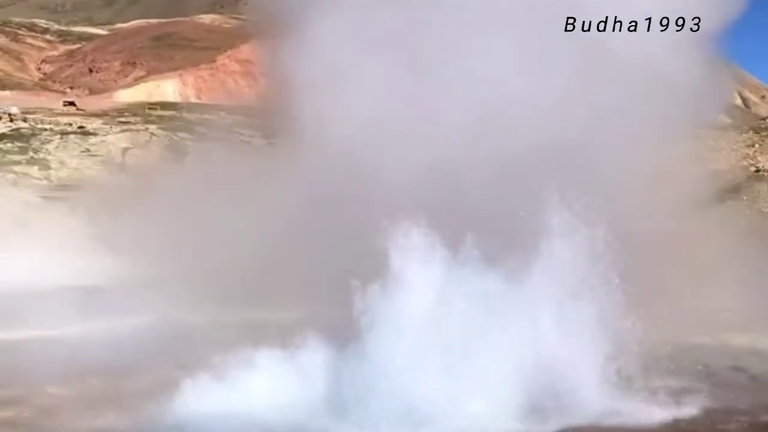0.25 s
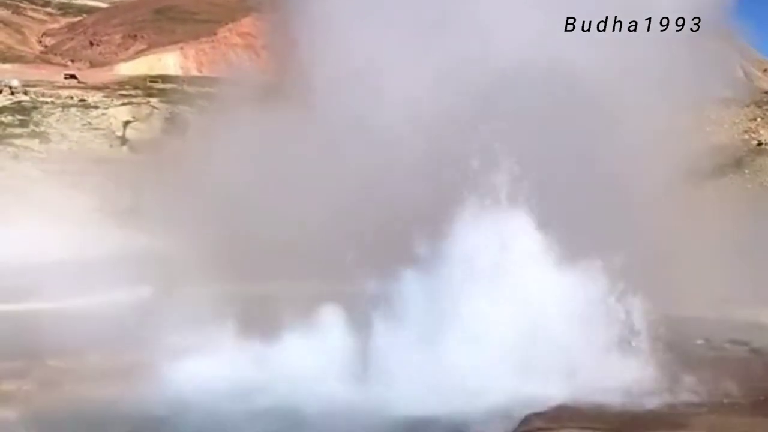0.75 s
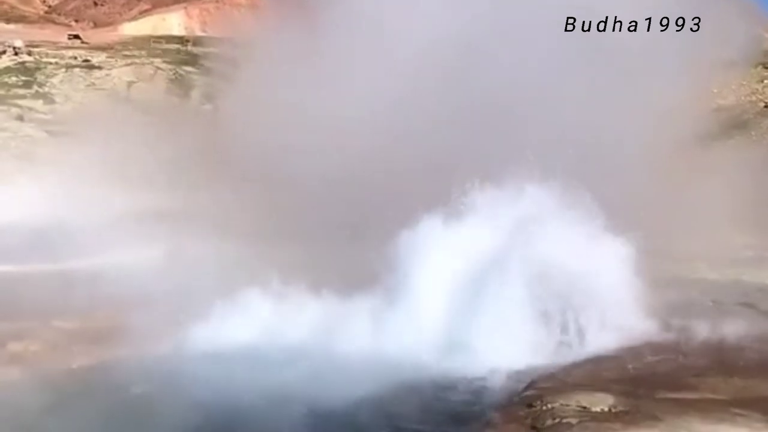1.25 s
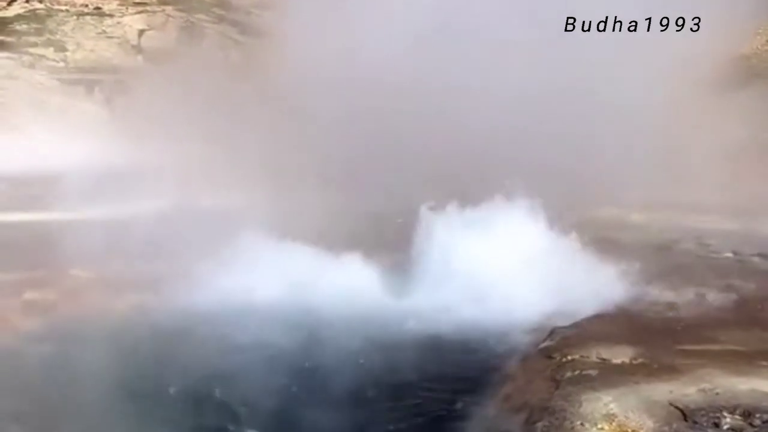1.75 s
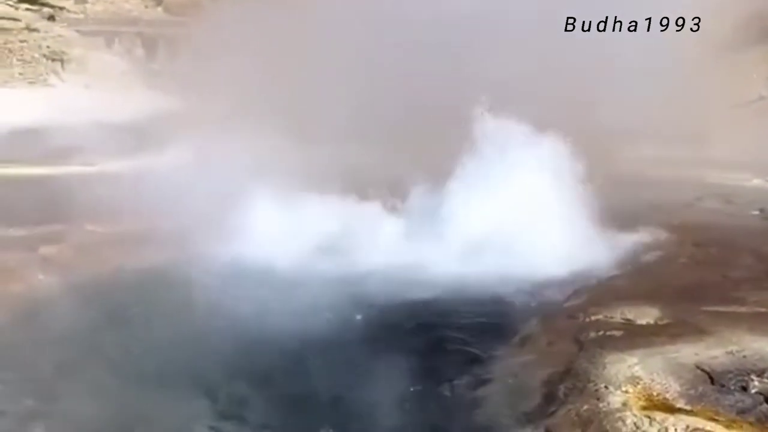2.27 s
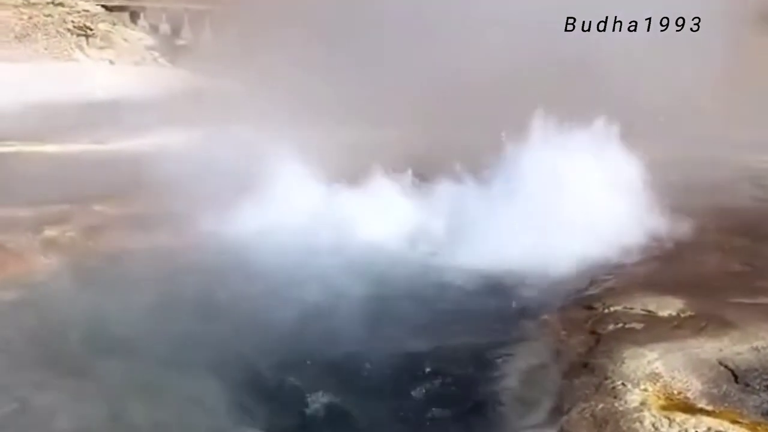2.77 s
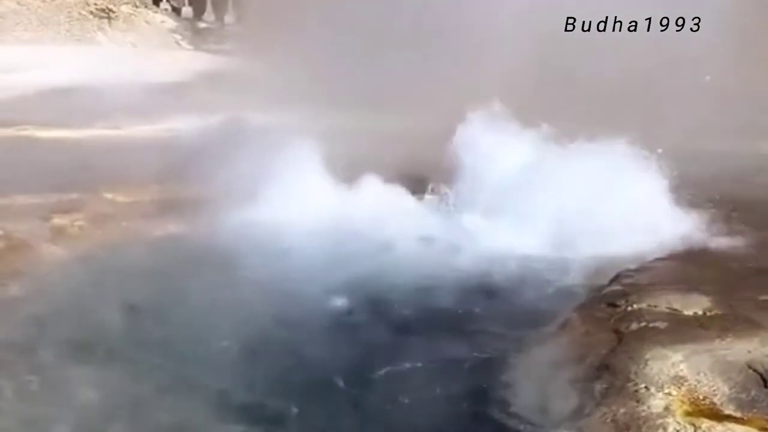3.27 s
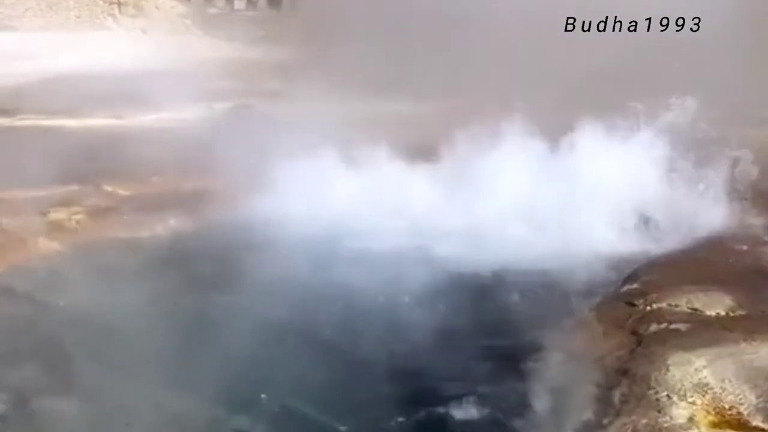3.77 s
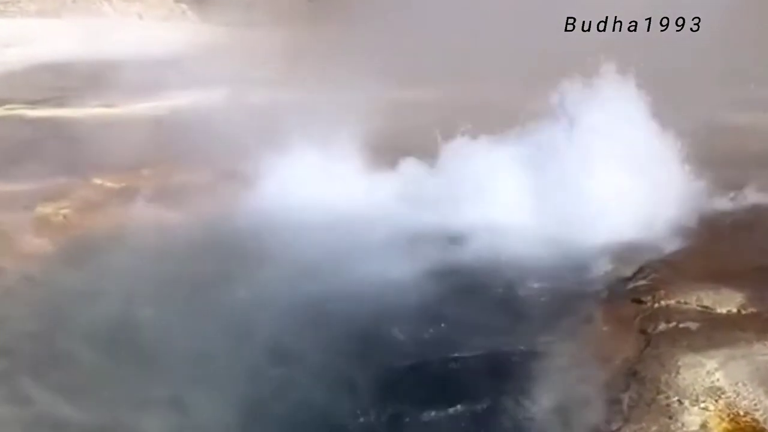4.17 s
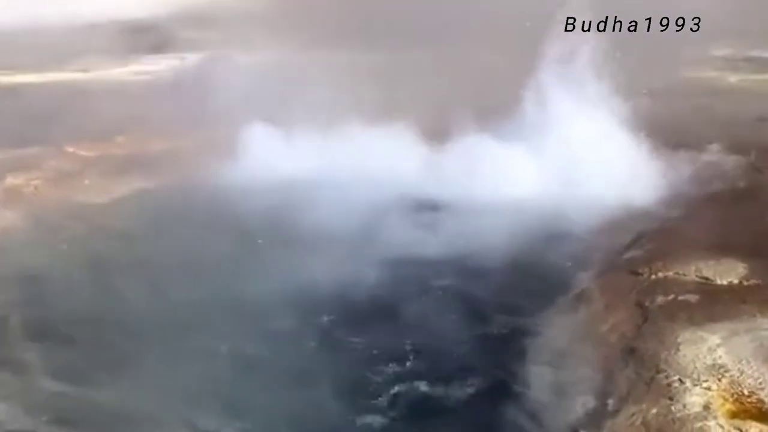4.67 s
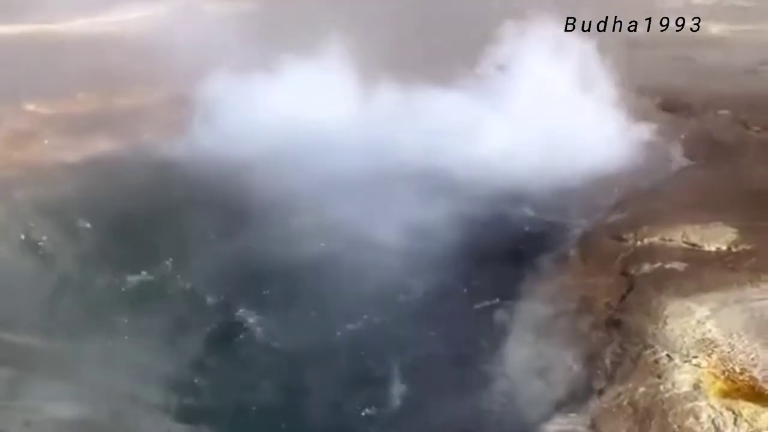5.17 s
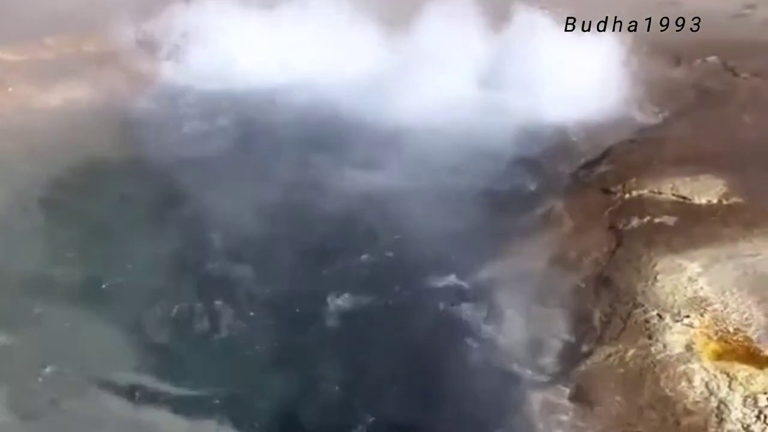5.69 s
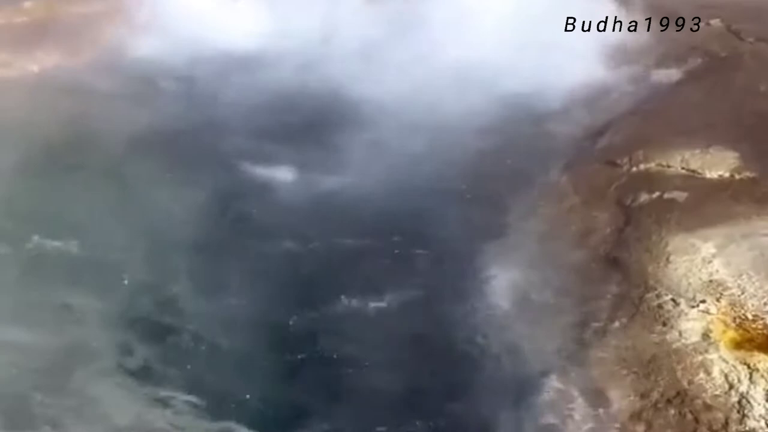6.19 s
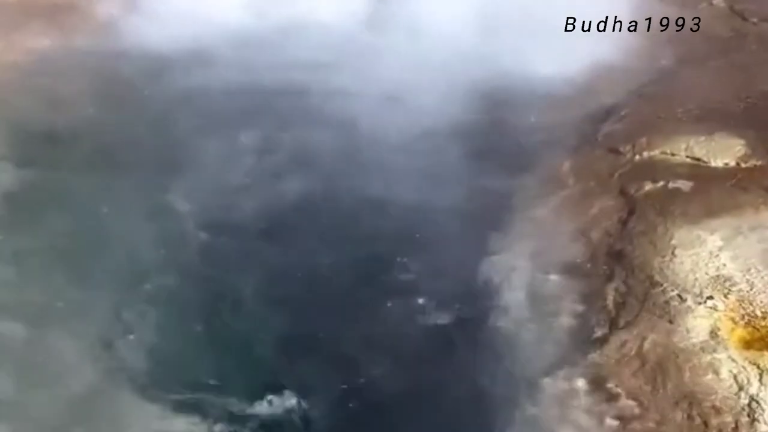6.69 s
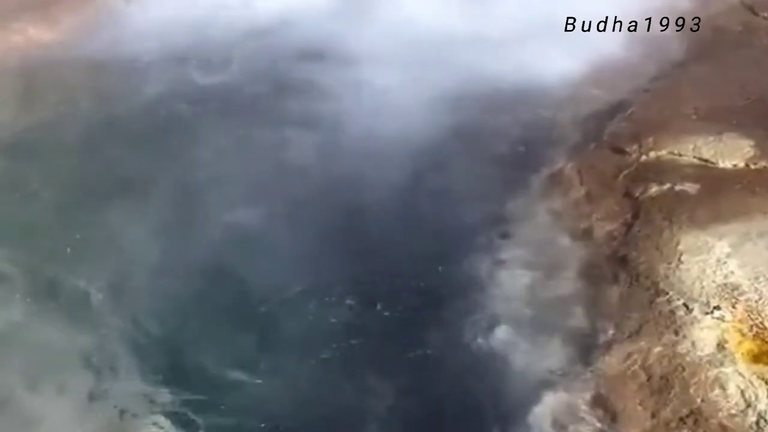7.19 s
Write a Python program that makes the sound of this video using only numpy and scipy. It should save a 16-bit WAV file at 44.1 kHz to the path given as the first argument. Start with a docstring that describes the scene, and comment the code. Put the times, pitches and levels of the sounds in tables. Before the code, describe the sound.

Wind batters a small stereo microphone beside a boiling geyser outdoors. From 0 to 1.3 seconds, low rumble and brief ragged flutters come and go, with a soft early thump and a slap near 0.8; a wide, thin hiss of spray sits behind, with tiny spits at the start and 0.5. The hiss swells a little around 1.4 as another slap lands, and scattered slaps follow to 2.2. A heavy round thump hits at 2.7, then a rapid run of dull slaps from 2.9 to 3.1. The wind flutters on, with a low thump at 3.8 and hard claps at 4.2 to 4.5. The spray is fainter now, with short spits at 5.0, 5.25 and 6.1. Sharper slaps cluster from 5.6 to 5.9. From 6.4 to the end near 7.4, gusts become harsh, tearing and crackling, with overloaded blows and deep closing thumps.

```python
"""Gusts of wind beside a geyser

Wind buffets a small pair of microphone ports while a geyser boils up and hisses across a pool.
Wind eddies are chopped, coloured noise: a lumpy rumble, a ragged flutter and a fine tearing.
Slaps are sharp fronts followed by short noise; thumps are a couple of low cycles under a swell.
The geyser is a smooth, wide, patchy hiss, with spits of water lifting it for a moment.
"""
import sys
import numpy as np
from scipy import signal
from scipy.fft import rfft, irfft, next_fast_len
from scipy.io import wavfile
from scipy.ndimage import uniform_filter1d

SR = 44100
rng = np.random.default_rng(int(sys.argv[2]) if len(sys.argv) > 2 else 0)


def generate_wav(signal):
    """Clip the signal to [-1, 1] and save it as 16-bit WAV at the path in sys.argv[1]."""
    frames = np.transpose(np.atleast_2d(signal))
    scaled = np.clip(frames, -1, 1) * 32767
    pcm = np.round(scaled).astype(np.int16)
    wavfile.write(sys.argv[1], SR, pcm)


N = 328104  # length [samples]

# Large eddies rolling over both ports, before buffets add to them:
# (time [s], rumble level [dB], gain of the deepest bass [dB])
GUSTS = [(0, -32.5, 5), (.15, -27, 9.5), (.3, -28.5, 0), (.6, -22, -5), (.9, -28, 0.5), (1.03, -32.5, -0.5),
         (1.45, -24, -5.5), (2.15, -28.5, 3.5), (2.25, -19.5, -2.5), (2.4, -25, -4), (2.55, -22, -4),
         (2.68, -9, -20), (2.83, -20, -4), (3.3, -25.5, 5.5), (4.15, -19.5, -6), (4.3, -17.5, 0),
         (4.7, -23, -2.5), (5.07, -27.5, -4), (5.55, -20.5, -3.5), (6.05, -36.5, 11), (6.6, -23, -1),
         (6.75, -22.5, 6.5), (7.2, -21, -2), (7.33, -16.5, 5), (7.44, -22.5, 9)]
# Buffets, each a short spell of small eddies:
# (start [s], length [s], flutter level [dB], tearing against flutter [dB],
#  one-port setting against flutter [dB]); the wind mix later lifts and colours the one-port setting
BUFFETS = [(0, 0.03, -21, -23, -7), (0.068, 0.038, -30.5, -0.5, 3.5), (0.157, 0.14, -26.5, -22.5, -2.5),
           (0.367, 0.14, -29.5, -20, -7.5), (0.544, 0.082, -22.5, -32, -8), (0.705, 0.12, -30.5, -9.5, 2),
           (0.875, 0.016, -24, -12, -12), (1.087, 0.068, -26.5, -33, -25), (1.355, 0.12, -27, -15, -6),
           (1.511, 0.035, -24.5, -11, 0.5), (1.549, 0.056, -20.5, -18.5, -6), (1.697, 0.053, -28, -37, 0),
           (1.795, 0.059, -34, -10, 6), (1.896, 0.055, -27.5, -13, -2), (1.969, 0.066, -24, -13, 0),
           (2.088, 0.021, -27.5, -10, 6.5), (2.199, 0.059, -23.5, -19.5, 0.5), (2.421, 0.14, -29.5, -23, 2),
           (2.57, 0.18, -26.5, -36, -4.5), (2.617, 0.068, -22.5, -17.5, -8), (2.753, 0.28, -25.5, -33, -13),
           (3.067, 0.1, -30.5, -24, -16), (3.331, 0.023, -33, -4, -9), (3.399, 0.054, -26.5, -13, -10),
           (3.462, 0.1, -32.5, -16, -5), (3.584, 0.079, -24.5, -36, -23), (3.731, 0.18, -22, -40, -9),
           (3.951, 0.24, -24.5, -23, -5.5), (4.226, 0.086, -22, -11, -5.5), (4.349, 0.081, -30, -5.5, -5),
           (4.493, 0.028, -33, -3.5, 8), (4.564, 0.11, -32, -18.5, 1.5), (4.705, 0.15, -28, -15, -15),
           (4.912, 0.082, -32, -13, -4), (5.109, 0.11, -23, -30, -4), (5.238, 0.053, -23, -34, -13.5),
           (5.333, 0.13, -26, -10.5, -2.5), (5.466, 0.087, -25.5, -5, -10), (5.552, 0.15, -29, -3.5, 0.5),
           (5.733, 0.11, -26, -7.5, -1), (5.828, 0.042, -26, 3.5, -8), (5.928, 0.065, -30.5, -3, -2),
           (6.038, 0.11, -36.5, 3.5, 3), (6.141, 0.22, -32, -14.5, -0.5), (6.381, 0.4, -25, -5, 1),
           (6.554, 0.12, -20, -1.5, -0.5), (6.739, 0.13, -27.5, 5, 2), (6.875, 0.14, -30.5, 3.5, 6),
           (7.156, 0.036, -26.5, -2.5, 7.5), (7.22, 0.032, -25, 6.5, -5), (7.322, 0.1, -27, -36, 6.5)]
# Levels between buffets: (flutter [dB], tearing [dB], one-port setting [dB])
CALM_LEVELS = (-43, -51, -38)
# Colours of the wind from large to tiny eddies; only the shape counts:
# (frequency [Hz], relative level per Hz [dB])
RUMBLE_COLOUR = [(20, -38), (40, -9.5), (60, 0), (130, -2), (220, -5), (330, -9), (600, -24.5),
                 (3000, -100)]
FLUTTER_COLOUR = [(60, -24.5), (200, 3.5), (350, 1), (600, 2), (900, -2), (1300, -10.5), (2000, -26.5),
                  (8000, -99)]
TEARING_COLOUR = [(400, -31), (1000, 3.5), (1500, 1.5), (2200, -6), (3200, -18), (4500, -30.5),
                  (7000, -44.5), (12000, -100)]
# Wind colour of the difference of the ports against their sum: (frequency [Hz], gain [dB])
WIND_DIFFERENCE = [(40, -33.5), (100, -13.5), (250, -12), (500, -8), (800, -7), (1200, -8.5), (1800, -14),
                   (4000, -3.5)]
# Single eddies bursting on the ports:
# (time [s], peak level [dB], centre frequency [Hz], dullness [power of the treble fall])
SLAPS = [(0.095, -17, 1210, 5.2), (0.83, -10.5, 965, 3.3), (1.416, -7.5, 650, 3.4), (1.719, -15, 554, 4.6),
         (1.985, -12.5, 795, 3.5), (2.169, -15, 910, 2.8), (2.182, -10, 1160, 4.8), (2.909, -7, 515, 3.5),
         (2.964, -9.5, 627, 5.6), (3.022, -6.5, 880, 4.3), (3.08, -7.5, 500, 4.1), (3.343, -14, 710, 3.4),
         (3.422, -6.5, 700, 4.2), (3.44, -23, 1080, 3.5), (4.246, -8, 800, 4.1), (4.254, -6, 900, 3.8),
         (4.317, -13, 1000, 4.2), (4.373, -4.5, 820, 3.5), (4.419, -11.5, 900, 3.7), (4.432, -13, 900, 4),
         (4.465, -17, 800, 3.2), (4.505, -13, 910, 3.6), (4.862, -9.5, 1060, 3.7), (5.367, -25, 834, 2.4),
         (5.496, -14, 830, 3.4), (5.634, -9.5, 1070, 3.1), (5.656, -5, 1110, 3.9),
         (5.732, -12.5, 1020, 3.3), (5.828, -10, 1320, 3.5), (5.848, -3, 1080, 3.3),
         (5.855, -12, 1400, 3.6), (5.871, -17, 1500, 4.2), (5.882, -15, 1300, 4.1), (5.906, -9, 1570, 4.6),
         (5.994, -13.5, 920, 3.8), (6.088, -15, 1120, 3.4), (6.123, -18, 1010, 4), (6.515, -3, 1300, 3),
         (6.68, -12, 1200, 3.1), (6.708, -3.5, 970, 2.7), (6.736, -15, 1200, 2.9), (6.761, -9.5, 888, 2.9),
         (6.795, -7.5, 1018, 2.6), (6.872, -10.5, 1210, 2.2), (6.927, -9, 1320, 3.5),
         (6.974, -7.5, 1630, 2.85), (7.008, -3, 2030, 3.3), (7.03, -20, 3020, 2.5),
         (7.118, -3.5, 1700, 2.8), (7.198, -6, 563, 2.64), (7.241, -5, 710, 3), (7.275, -3, 720, 2.3)]
# Large eddies landing as one round thump: (middle [s], peak of the swell [dB], pitch [Hz])
THUMPS = [(0.177, -12, 123), (2.234, -17, 110), (2.662, -5, 190), (2.69, -10, 171), (2.897, -13, 160),
          (3.838, -8.5, 181), (6.705, -11, 84.6), (7.312, -9, 106), (7.337, -12, 109), (7.397, -13, 95)]
# Spray and steam without the spits: (time [s], level [dB])
SPRAY_LEVEL = [(0.0, -45), (0.38, -41), (1.4, -36.5), (1.53, -41.5), (2.26, -42.5), (2.9, -46), (3.25, -44),
               (3.87, -51.5), (4.54, -50.5), (4.68, -44), (4.88, -50), (4.97, -44), (5.29, -49.5),
               (6.08, -50.5), (7.06, -49), (7.43, -53)]
# Sudden spits of water: (time [s], rise of the hiss [dB])
SPITS = [(0.039, 8), (0.495, 10), (3.158, 5.5), (5.011, 11), (5.258, 6), (6.108, 10), (6.13, 14)]
# Spray colours for the sum and the difference of the ports; the sum has a gap near 10 kHz:
# (frequency [Hz], relative level per Hz [dB])
SPRAY_SUM = [(600, 14.5), (2000, 11), (3200, 8), (4500, 6.5), (4900, 0.5), (5400, 5), (8000, 1.5),
             (8900, -0.5), (9200, -87), (11000, -18.5), (11400, -3), (13500, 3), (15500, -3.5)]
SPRAY_DIFFERENCE = [(100, 1), (800, 0.5), (2000, -10.5), (3500, -5.5), (5000, 2.5), (6000, -2), (8000, 5.5),
                    (9500, 6), (11500, 2.5), (13500, 0.5), (14300, -21), (14700, -47.5)]

ATTACK_S, RELEASE_S = 0.011, 0.024  # time for a buffet to grow or shrink by a factor of e
RUMBLE_FOLLOWS = 0.31  # dB of rumble for each dB by which a buffet lifts the flutter
DEEP_HZ = 110  # upper edge of the deepest bass
SLAP_CYCLES = 1  # a slap's noise swells for this many cycles of its centre, so low ones last longer
THUMP_CYCLES = 0.8  # half-width of a thump's swell
# Towards the end the bass turns mono below an edge that climbs steadily
MONO_FROM_S, MONO_START_HZ, MONO_OCTAVES_PER_S = 6.16, 166, 2.1
BAND_EDGE_HZ = 15760


def wind(flutter_db, tearing_db, one_port_db):
    """The smaller the eddies, the more raggedly they come and go, all on one shared turbulence."""
    turbulence = wobble(5.4, 337.0, 0.11)

    lift_db = flutter_db - uniform_filter1d(flutter_db, size=SR // 2)
    followed_db = RUMBLE_FOLLOWS * uniform_filter1d(lift_db, size=SR // 30)
    rumble_db = curve(GUSTS, order=1) + followed_db
    rumble_apart_db = 0.33 * rumble_db + 0.5 * one_port_db + 4.0
    rumble_ragged_db = 0.39 * turbulence + 1.42 * wobble(4.6, 44.0, 0.8)
    rumble = eddies(RUMBLE_COLOUR, rumble_db, rumble_apart_db, rumble_ragged_db)
    deep_filter = signal.butter(2, DEEP_HZ, fs=SR, output="sos")
    deep = signal.sosfiltfilt(deep_filter, rumble)
    rumble = rumble + (amp(curve(GUSTS, order=2)) - 1) * deep

    flutter_ragged_db = 2.44 * turbulence + puffs(70.0, 0.0035, 3.73, 4.0)
    flutter = eddies(FLUTTER_COLOUR, flutter_db, one_port_db + 9.0, flutter_ragged_db)

    tearing_ragged_db = 1.4 * turbulence + puffs(160.0, 0.00078, 3.03, -4.0)
    tearing = eddies(TEARING_COLOUR, tearing_db, tearing_db, tearing_ragged_db)

    # Each eddy size has its own moment
    return patchy(rumble + flutter + tearing, 2.5, frames=10, bins=3)


def buffets():
    """Levels of flutter, tearing and the one-port setting: buffets rise, hold and die over the calm."""
    time = np.arange(0, N, 32) / SR
    start, length, flutter_db, tearing_db, one_port_db = np.transpose(BUFFETS)[:, :, None]
    rise = np.minimum((time - start) / ATTACK_S - 1, 0)
    fall = np.minimum((start + length - time) / RELEASE_S, 0)
    shape = np.exp(rise + fall)
    tops_db = (flutter_db, flutter_db + tearing_db, flutter_db + one_port_db)
    levels = []
    for calm_db, top_db in zip(CALM_LEVELS, tops_db):
        power = amp(calm_db) ** 2 + np.sum((amp(top_db) * shape) ** 2, axis=0)
        levels.append(np.interp(np.arange(N) / SR, time, 10 * np.log10(power)))
    return levels


def eddies(colour, level_db, apart_db, ragged_db):
    """Noise chopped by passing eddies, then coloured; the ports share only part of it."""
    common, separate = rng.standard_normal((2, N)) * evened(amp(ragged_db))
    # Loudness of plain noise in this colour, divided out below
    size = np.sqrt(np.mean(coloured(rng.standard_normal(N), colour) ** 2))
    centre = coloured(common * amp(level_db), colour)
    apart = coloured(coloured(separate * amp(apart_db), colour), WIND_DIFFERENCE)
    return np.array([centre, apart]) / size


def puffs(per_s, length_s, spread_db, steady_db):
    """Level in dB of separate small eddies, each a quick swell and a fade, over a steady stream."""
    happens = rng.random(N) < per_s / SR
    size = amp(spread_db * np.minimum(rng.exponential(1, N), 2.5)) * happens
    t = np.arange(2000) / SR / length_s
    swells = signal.oaconvolve(size, t * np.exp(-t))[:N]
    return 20 * np.log10(evened(swells).clip(0) + amp(steady_db))


def slaps():
    """A bursting eddy is a sharp front in a few milliseconds of noise, broad around its centre."""
    length, lead = 2048, 256  # samples; the noise starts after the lead
    out = np.zeros((2, N + length))
    t = np.arange(length) / SR
    f = np.fft.rfftfreq(length, 1 / SR) + 1
    front = signal.unit_impulse(length, idx=280)
    noises = rng.standard_normal((len(SLAPS), 2, length))
    for (s, db, hz, dull), noise in zip(SLAPS, noises):
        shape = (f / hz) ** 0.7 / (1 + (f / hz) ** dull)
        shape = shape / (1 + (f / 7500) ** 4.8)
        shape = shape * amp([0 * f, read(WIND_DIFFERENCE, f)])  # sum and difference of the ports
        late = np.maximum(t - lead / SR, 0) * hz / SLAP_CYCLES
        burst = irfft(rfft(noise * late * np.exp(-late) + 3.74 * front) * shape)
        at = round(s * SR) - lead
        out[:, at:at + length] += amp(db) * burst / abs(burst[0]).max()
    return out[:, :N]


def thumps():
    """A large eddy gives a couple of low cycles under a bell-shaped swell, alike on both ports."""
    out = np.zeros((2, N + 4096))
    t = (np.arange(4096) - 2048) / SR
    for (s, db, hz), turn in zip(THUMPS, rng.random(len(THUMPS))):
        at = round(s * SR) - 2048
        swell = np.exp(-(t * hz / THUMP_CYCLES) ** 2)
        cycles = np.sin(2 * np.pi * (hz * t + turn))
        out[0, at:at + 4096] += amp(db) * swell * cycles
    return out[:, :N]


def geyser():
    """Countless droplets merge into a patchy hiss; spits lift it for a moment."""
    hz = np.fft.rfftfreq(512, 1 / SR)[:, None]
    a, b, c, d = rng.standard_normal((N // 128 + 5, 257, 4)).T
    centre = a + 1j * b
    # A source off to one side arrives a little earlier at one port:
    # part of the difference is the sum turned a quarter cycle, the other way above 10 kHz
    direct = 0.55
    turned = 1j * np.sign(10000 - hz) * centre
    apart = direct * turned + np.sqrt(1 - direct ** 2) * (c + 1j * d)
    colours = amp([read(SPRAY_SUM, hz), read(SPRAY_DIFFERENCE, hz)])
    z = np.array([centre, apart]) * colours
    hiss = evened(signal.istft(z, nperseg=512, noverlap=384)[1][:, :N])
    time = np.arange(N) / SR
    spits_db = sum(db * np.exp(-abs(time - s) / 0.007) for s, db in SPITS)
    return patchy(hiss, 1.33, frames=30, bins=25) * amp(curve(SPRAY_LEVEL, order=1) + spits_db)


def patchy(x, depth_db, frames, bins):
    """Random patches over time and frequency lift and sink the colour for a moment."""
    z = signal.stft(x, nperseg=512, noverlap=384)[2]
    field = rng.standard_normal(z.shape[:0:-1]).T
    field = uniform_filter1d(field, size=frames, axis=1)
    field = uniform_filter1d(field, size=bins, axis=0)
    gain = evened(amp(depth_db * evened(field)))
    return signal.istft(z * gain, nperseg=512, noverlap=384)[1][:, :N]


def wobble(lo_hz, hi_hz, fall):
    """Random curve of rms 1, mostly between two rates, with slower ones stronger there."""
    f = np.fft.rfftfreq(N, 1 / SR) + 1e-3
    shape = f ** -fall / (1 + (lo_hz / f) ** 4) / (1 + (f / hi_hz) ** 4)
    return evened(irfft(rfft(rng.standard_normal(N)) * shape, N))


def coloured(x, points):
    """Shapes the spectrum of a whole signal."""
    size = next_fast_len(N + 8192)
    gain = amp(read(points, np.fft.rfftfreq(size, 1 / SR)))
    return irfft(rfft(x, size) * gain, size)[:N]


def read(points, hz):
    """Reads a spectrum table in dB on a log-frequency axis."""
    f, value = np.transpose(points)
    return np.interp(np.log(hz + 1), np.log(f + 1), value)


def curve(table, order):
    """One column of a time table, joined by straight lines at every sample."""
    rows = np.array(table)
    return np.interp(np.arange(N) / SR, rows[:, 0], rows[:, order])


def evened(x):
    """Scales a signal to rms 1."""
    return x / np.sqrt(np.mean(x ** 2) + 1e-20)


def amp(db):
    """Gain of a level in dB."""
    return 10 ** (np.asarray(db) / 20)


def scene():
    """Left and right from the sum and difference of the ports."""
    centre, apart = wind(*buffets()) + slaps() + thumps() + geyser()
    return np.array([centre + apart, centre - apart])


def record(dry):
    """The bass loses its width below a rising edge; soft overload; then the band limit."""
    centre, apart = (dry[0] + dry[1]) / 2, (dry[0] - dry[1]) / 2
    hz, t, z = signal.stft(apart, SR, nperseg=1024, noverlap=768)
    climb = 2 ** (MONO_OCTAVES_PER_S * (t - MONO_FROM_S))
    edge_hz = (t > MONO_FROM_S) * MONO_START_HZ * climb
    z = z / (1 + (edge_hz / (hz[:, None] + 1)) ** 7.3)
    apart = signal.istft(z, SR, nperseg=1024, noverlap=768)[1][:N]
    pair = np.tanh([centre + apart, centre - apart])  # the input stage rounds off the hardest blows
    low_pass = signal.firwin(1535, BAND_EDGE_HZ, window=("kaiser", 9), fs=SR)
    return signal.oaconvolve(pair, low_pass[None], "same")


dry = scene()
out = record(dry)
generate_wav(out)
```